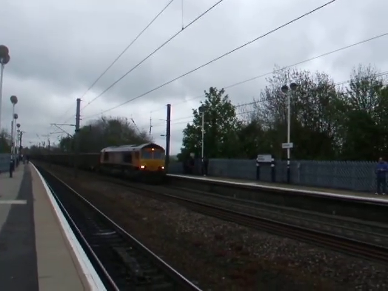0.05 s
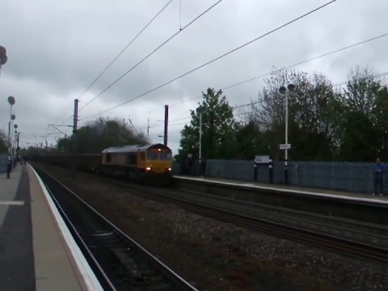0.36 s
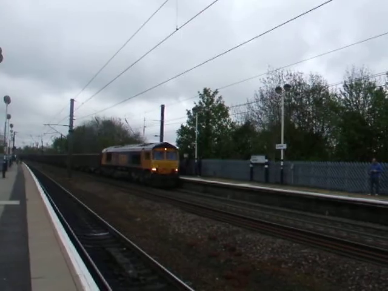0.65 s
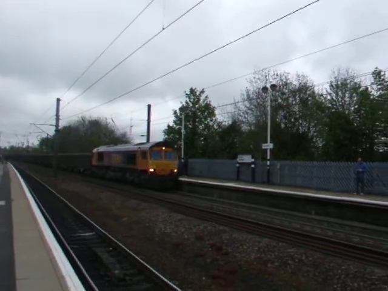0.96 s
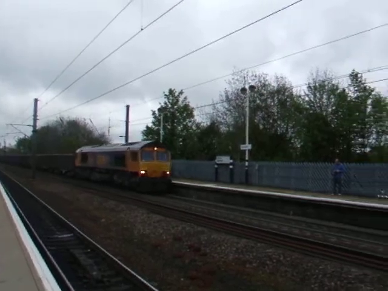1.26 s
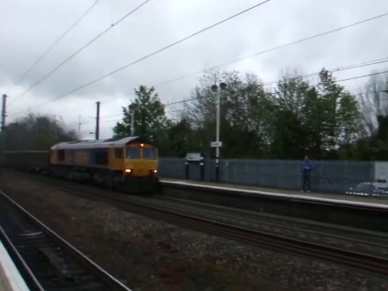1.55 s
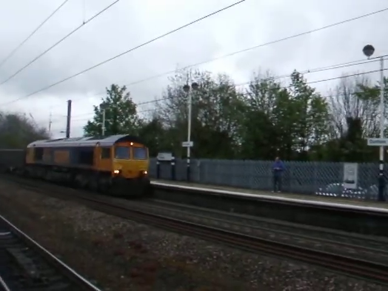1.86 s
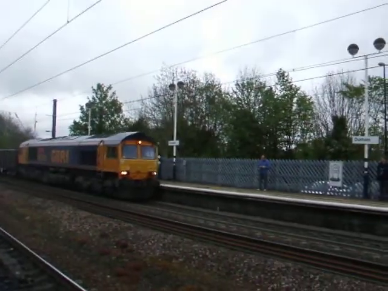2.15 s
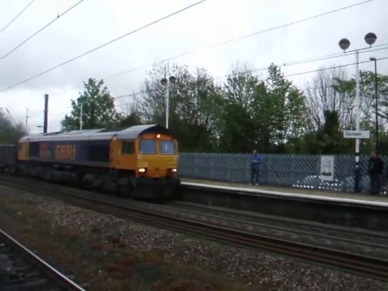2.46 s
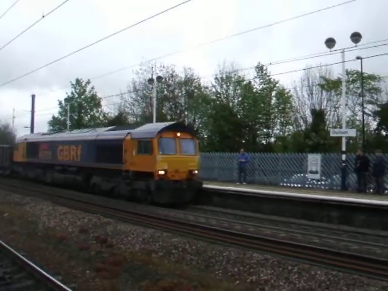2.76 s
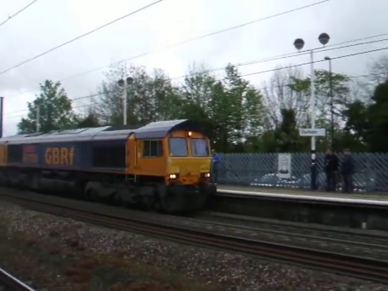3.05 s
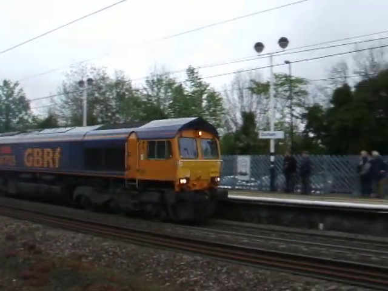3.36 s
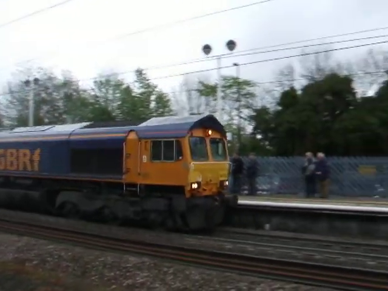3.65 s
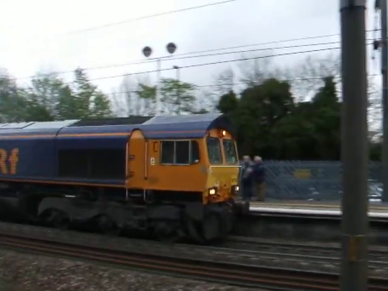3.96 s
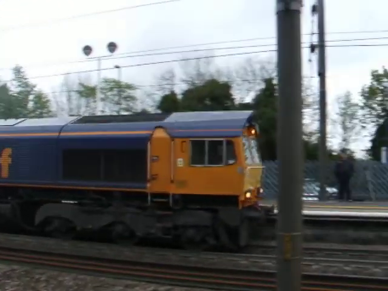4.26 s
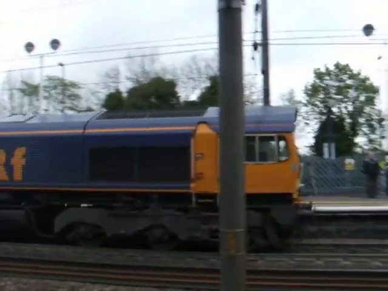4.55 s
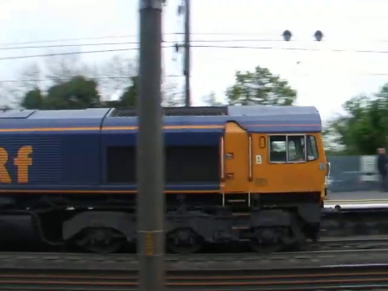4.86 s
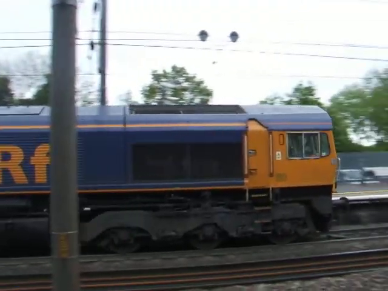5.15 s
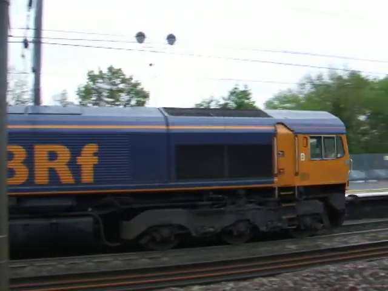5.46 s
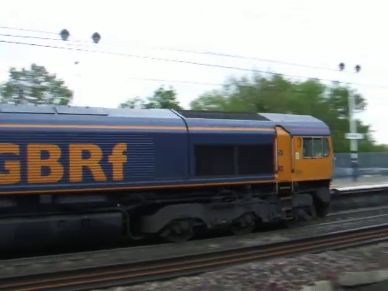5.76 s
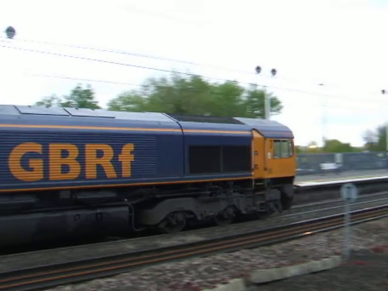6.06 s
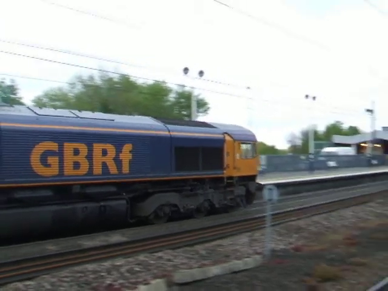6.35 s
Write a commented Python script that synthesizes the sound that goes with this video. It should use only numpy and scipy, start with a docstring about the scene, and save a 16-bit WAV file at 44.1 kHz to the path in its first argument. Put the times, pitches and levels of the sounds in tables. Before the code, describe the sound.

A loud, pure, deep electrical hum runs from start to finish, stronger than everything else. Over it, heard from a station platform, a diesel freight locomotive approaches with a throbbing exhaust, fluttering whines of fans and gears, and a low rumble of wagons. Soft puffs of wind touch the microphone during the first two seconds or so, and again near 5.3 seconds. Wheel roar and rail hiss grow steadily, with tiny high sizzles around 1.5, 2 and 2.8 seconds and a longer one near 4.4. The whines swell briefly around 3 and 3.7 seconds. The train is strongest from about 5 to 6 seconds as the locomotive passes, while the hum dips slightly. The exhaust and whines sink in pitch as it goes by, and the train is still rolling close at the end, around 6.5 seconds.

```python
"""At a station platform, a two-stroke diesel freight locomotive draws near and passes, wagons behind it.
Its exhaust throbs with the turning crankshaft, fans and gears whine, and both sink in pitch as it goes by.
Rough wheels roar and make the rails hiss, with a few brief sizzles on top.
Puffs of wind touch the microphone, and a loud, deep, mains-like hum lies under everything."""
import sys
import numpy as np
from scipy import signal
from scipy.fft import rfft, irfft, next_fast_len
from scipy.io import wavfile
from scipy.ndimage import uniform_filter1d

SR = 44100
rng = np.random.default_rng(int(sys.argv[2]) if len(sys.argv) > 2 else 0)


def digitize_waveform(pressure):
    """Quantize a signal to 16-bit integers and store it at the path in sys.argv[1].

    Rows of a 2-D input are taken as channels; values are limited to [-1, 1].
    """
    field = np.atleast_2d(pressure).T
    bounded = np.clip(field, -1, 1)
    quanta = np.round(bounded * 32767).astype(np.int16)
    wavfile.write(sys.argv[1], SR, quanta)


N = 281799
T = np.arange(N) / SR

TRAIN_M_S, SOUND_M_S, TRACK_DISTANCE_M = 11.5, 343, 18.5
# when each part passes the listener: leading wheels, middle, exhaust and fans
FRONT_S, MIDDLE_S, ENGINE_S = 5.17, 5.54, 6.08


def exhaust(crank, near):
    """Unequal cylinders repeat their pattern every crank turn, making a stack of low tones."""
    # exhaust tones at track distance: (cycles per crank turn, head-on level [dB], side-on level [dB])
    tones = [(2, -33.5, -38), (3, -33, -40), (5, -35, -35.5), (6, -40.5, -39), (7, -40.5, -40.5),
             (8, -39.5, -45), (10, -43.5, -41), (11, -38, -54), (12, -44.5, -44), (13, -42.5, -42),
             (14, -39.5, -41.5), (15, -49.5, -44), (16, -54.5, -46), (18, -51.5, -49.5), (19, -49, -49.5)]
    return sum(passing_gain(near, multiple, *levels) * tone(multiple * crank, flutter=0.3, rate_hz=6)
               for multiple, *levels in tones)


def whines(crank, near):
    """Fan blades, gears and turbocharger turn with the engine; higher tones flutter faster."""
    # whines at track distance:
    # (cycles per crank turn, flutter [0-1], head-on level [dB], side-on level [dB])
    tones = [(14.32, .3, -41.5, -47), (23.55, .6, -44.5, -43.5), (30.3, 0.7, -55.5, -50.5),
             (39, 0.8, -50, -50), (47.2, .75, -50, -50.5), (71.6, 0.8, -48.5, -58.5), (79, .5, -44, -48.5),
             (95.1, 0.7, -50, -67.5), (113.4, 0.6, -51.5, -57), (143.3, 0.6, -49, -61)]
    return sum(passing_gain(near, multiple, *levels) * tone(multiple * crank, flutter, 7 + 0.1 * multiple)
               for multiple, flutter, *levels in tones)


def rumble(crank, engine_db=-33.5, wagons_db=-37.5, throb=0.25):
    """Exhaust gas, shaking bodywork and the long line of wagons rumble, swelling once a crank turn."""
    # the rumble's spectrum: (frequency [Hz], relative level [dB])
    colour = [(8, -16.5), (18, -11), (35, -1), (70, 0.5), (120, -2), (170, -9), (230, -6), (300, -10.5),
              (420, -17), (600, -25), (1500, -46)]
    engine_gain = undb(engine_db) * nearness(MIDDLE_S) ** 2.3
    gain = np.hypot(engine_gain, undb(wagons_db))
    return gain * noise(colour) * (1 + throb * np.cos(crank))


def rolling(crank, roar_db=-34, hiss_db=-38, clatter=0.036):
    """Rough treads make the wheels roar and the rails hiss; engine clatter ripples both."""
    # spectra of the wheels and of the rails: (frequency [Hz], relative level [dB])
    roar_colour = [(150, -15), (330, 1.5), (520, -1.5), (660, 3), (820, -1), (980, -1.5), (1130, -0.5),
                   (1350, -2.5), (2100, -4.5), (2480, -7.5), (3000, -14.5), (4500, -12.5), (8000, -31.5)]
    hiss_colour = [(1200, -18), (2450, -6.5), (2950, 3), (3400, 0.5), (3900, 0), (4400, -3), (4800, -0.5),
                   (5300, -4), (6500, -3), (7400, -3), (8000, -8), (8500, -18.5), (9000, -36.5)]
    # a power below 1 fades more slowly with distance, as a long source does
    roar = nearness(MIDDLE_S) ** 0.77 * noise(roar_colour, flicker_db=0.45, flicker_hz=14)
    hiss = nearness(FRONT_S) ** 0.99 * noise(hiss_colour, flicker_db=0.5, flicker_hz=25)
    rough_patches = undb(0.4 * wander(35))
    return (undb(roar_db) * roar + undb(hiss_db) * hiss) * rough_patches * (1 + clatter * np.cos(crank))


def sizzles():
    """The high treble sizzles briefly now and then."""
    # each sizzle: (time [s], half length [s], level [dB])
    events = [(1.485, 0.011, -45), (1.56, 0.011, -51), (1.62, 0.011, -51), (2.07, 0.01, -47),
              (2.79, 0.029, -49.5), (4.36, 0.092, -45)]
    # their spectrum: (frequency [Hz], relative level [dB])
    colour = [(3000, -20), (5500, 0.5), (7000, -2), (7900, 0.5), (8500, -12.5), (9000, -36)]
    return bursts(events, colour)


def wind():
    """Puffs of air hit the microphone with a low flutter."""
    # each puff: (time [s], half length [s], level [dB])
    puffs = [(.28, 0.034, -34.5), (.43, 0.053, -35.5), (.7, 0.097, -40), (1.1, 0.084, -33.5),
             (1.74, .05, -35), (1.95, 0.065, -40), (2.2, 0.055, -36), (5.33, 0.085, -38.5)]
    # their spectrum: (frequency [Hz], relative level [dB])
    colour = [(10, -8), (28, -3), (70, -1), (160, -8), (300, -10.5), (520, -12), (900, -42.5),
              (2000, -53.5)]
    return bursts(puffs, colour)


def hum(pitch_hz=50.108, level_db=-13, dip_db=2.5):
    """A pure, deep hum keeps its pitch and gets a little quieter while the train goes by."""
    gain = undb(level_db - dip_db * nearness(MIDDLE_S))
    return np.sqrt(2) * gain * np.sin(2 * np.pi * pitch_hz * T)


def crank_angle(turns_per_s=14.93):
    """The crank's steady turning, heard late: pitch is higher coming and lower going (Doppler effect)."""
    distance_m = TRACK_DISTANCE_M / nearness(ENGINE_S)
    return 2 * np.pi * turns_per_s * (T - distance_m / SOUND_M_S)


def nearness(passing_s):
    """How near a part of the train is on its straight track: 1 as it passes, 0.5 at twice the distance."""
    return TRACK_DISTANCE_M / np.hypot(TRACK_DISTANCE_M, TRAIN_M_S * (T - passing_s))


def passing_gain(near, multiple, head_on_db, side_on_db):
    """A tone's strength changes as the engine nears, shows its side and sweeps beams of sound past us."""
    # beams crossing the platform: (time [s], half length [s], cycles per crank turn, boost [dB])
    beams = [(2.6, 0.33, 14, 3.5), (2.935, .14, 79, 8.5), (3.02, 0.13, 47, 9), (3.678, 0.17, 95, 11.5),
             (4.1, 0.33, 14, 5), (4.648, 0.32, 23.5, 5), (5.203, 0.4, 7, 11), (5.3, 0.09, 39, 9),
             (5.9, 0.24, 79, 5), (5.9, .18, 47, 6.5)]
    db = head_on_db + (side_on_db - head_on_db) * near ** 2
    for time_s, half_s, centre, boost_db in beams:
        if abs(np.log(multiple / centre)) < 0.1:  # only tones within about 10% of the beam's pitch
            db = db + boost_db * swell(time_s, half_s)
    return near * undb(db)


def tone(angle, flutter, rate_hz):
    """A tone flutters as its direct sound mixes with sound scattered by the ground and the train."""
    direct = np.sqrt(1 - flutter ** 2)
    scattered = flutter * (wander(rate_hz) + 1j * wander(rate_hz)) / np.sqrt(2)
    phase = angle + 2 * np.pi * rng.random()
    return np.sqrt(2) * np.real((direct + scattered) * np.exp(1j * phase))


def bursts(events, colour, ragged_db=2.5):
    """Short, ragged swells of noise."""
    envelope = sum(undb(db) * swell(time_s, half_s) for time_s, half_s, db in events)
    return noise(colour) * undb(ragged_db * wander(60)) * envelope


def noise(colour, flicker_db=0, flicker_hz=10):
    """Noise with a given spectrum; each octave can flicker on its own."""
    size = next_fast_len(N)
    octave = np.log2(np.maximum(np.fft.rfftfreq(size, 1 / SR), 1))
    hz, db = np.transpose(colour)
    shape_db = np.interp(octave, np.log2(hz), db, left=-np.inf, right=-np.inf)
    spectrum = rfft(rng.standard_normal(size)) * undb(shape_db)
    if not flicker_db:
        return unit(irfft(spectrum, size)[:N])
    bands = (irfft(spectrum * np.maximum(1 - abs(octave - centre), 0), size)[:N] for centre in range(6, 15))
    return unit(sum(band * undb(flicker_db * wander(flicker_hz)) for band in bands))


def wander(rate_hz):
    """A smooth random curve, roughly 1 in size, that changes about rate_hz times a second."""
    step = max(int(SR / rate_hz), 2)
    held = np.repeat(rng.standard_normal(N // step + 3), step)
    return 1.8 * uniform_filter1d(uniform_filter1d(held, step), step)[step:step + N]


def swell(time_s, half_s):
    """A smooth rise and fall around time_s."""
    return np.exp(-0.5 * ((T - time_s) / half_s) ** 2)


def undb(db):
    """Turn decibels into a gain."""
    return 10 ** (np.asarray(db) / 20)


def unit(x):
    """Scale to an average strength (rms) of 1."""
    return x / np.sqrt(np.mean(x ** 2))


def scene():
    """The train, the wind and the hum in one channel."""
    crank, near = crank_angle(), nearness(ENGINE_S)
    engine = exhaust(crank, near) + whines(crank, near) + rumble(crank)
    return (engine + rolling(crank) + sizzles() + wind() + hum())[None]


def record(dry, top_hz=8800):
    """A steep filter cuts off the highest treble."""
    return signal.sosfilt(signal.ellip(10, 0.1, 80, top_hz, fs=SR, output="sos"), dry)


dry = scene()
out = record(dry)
digitize_waveform(out)
```